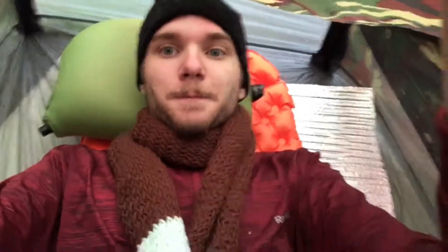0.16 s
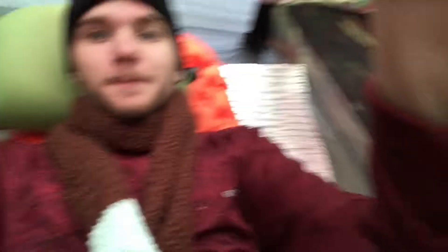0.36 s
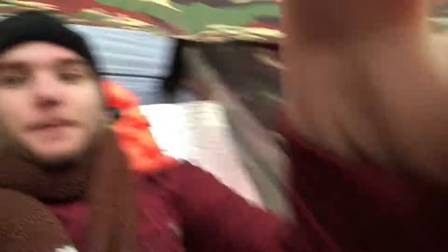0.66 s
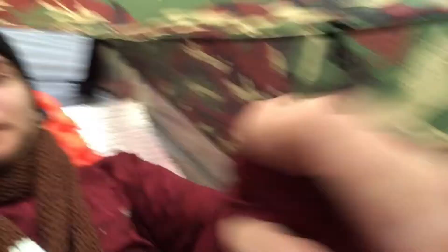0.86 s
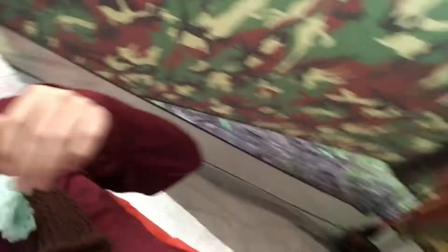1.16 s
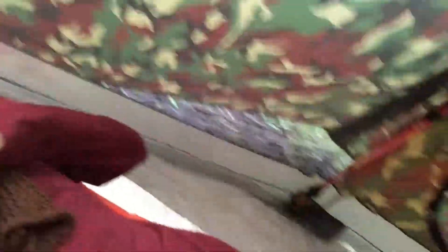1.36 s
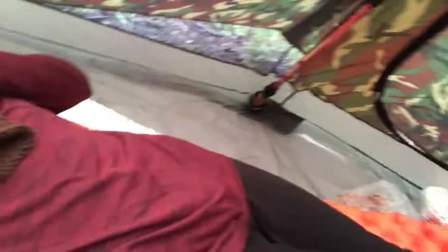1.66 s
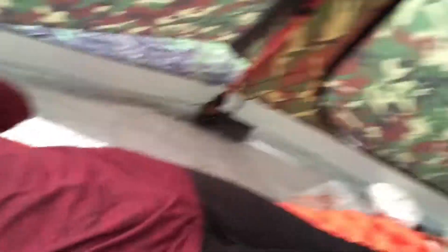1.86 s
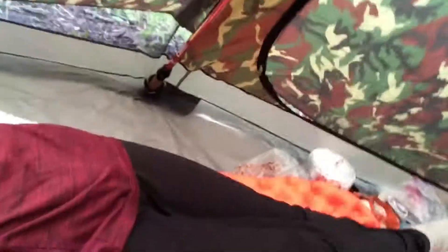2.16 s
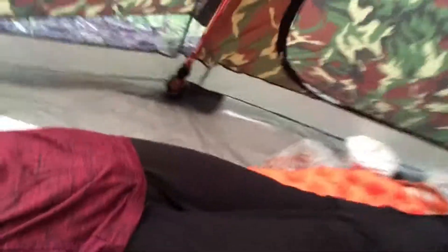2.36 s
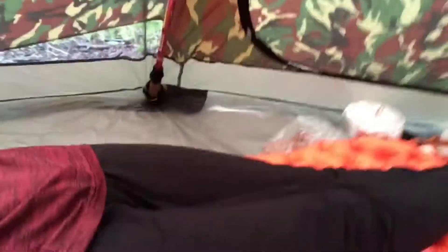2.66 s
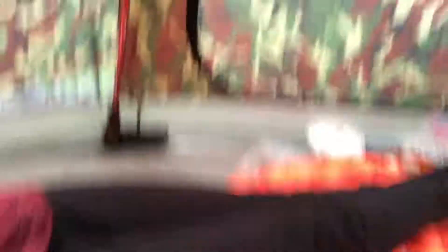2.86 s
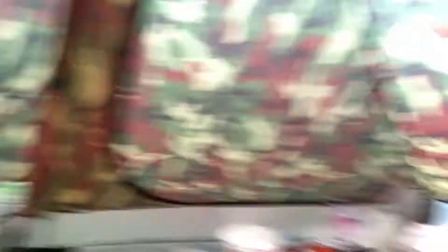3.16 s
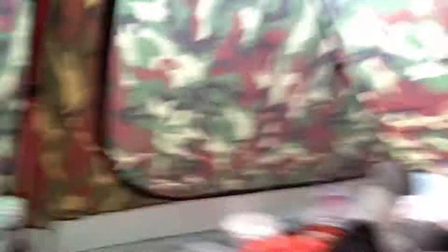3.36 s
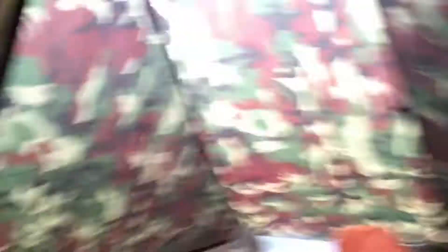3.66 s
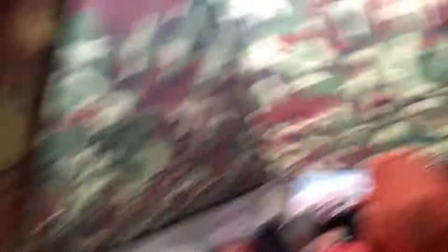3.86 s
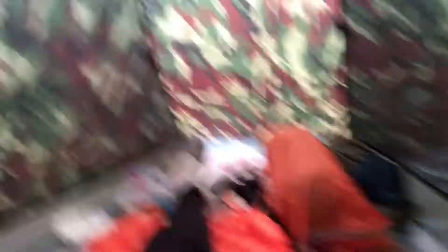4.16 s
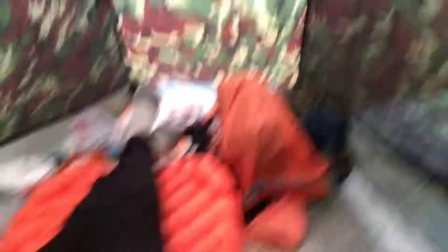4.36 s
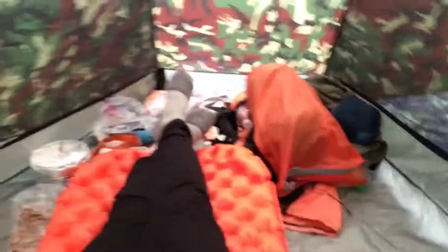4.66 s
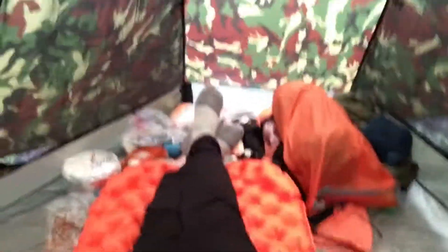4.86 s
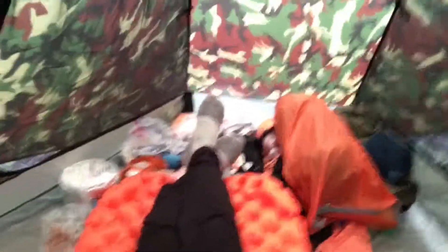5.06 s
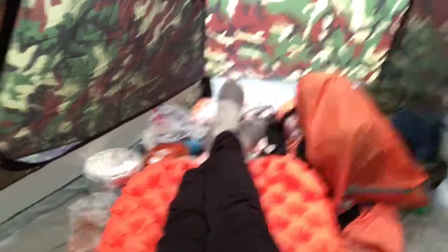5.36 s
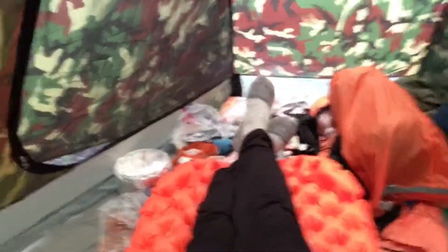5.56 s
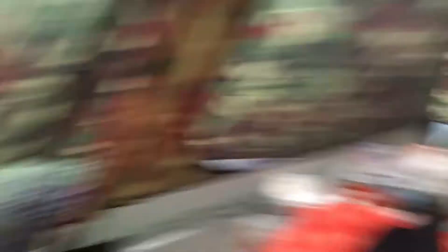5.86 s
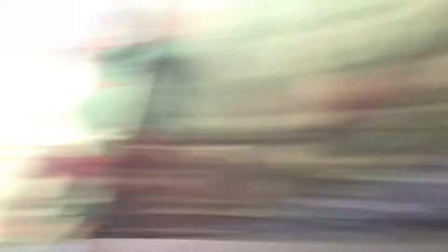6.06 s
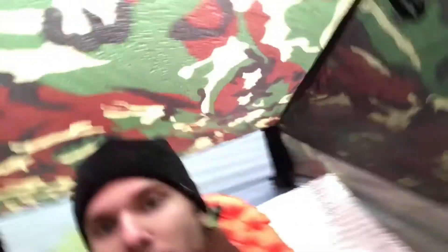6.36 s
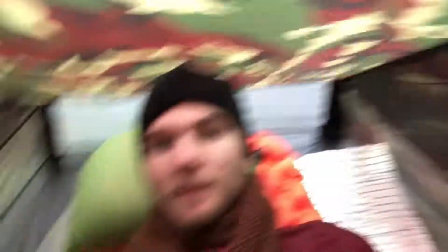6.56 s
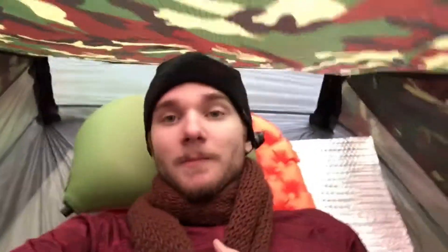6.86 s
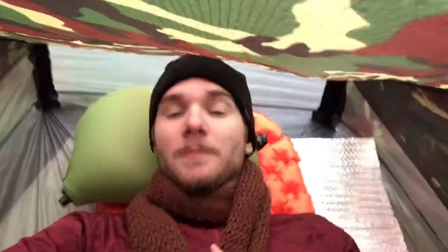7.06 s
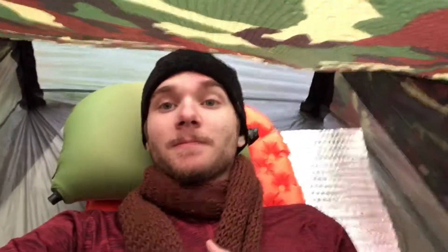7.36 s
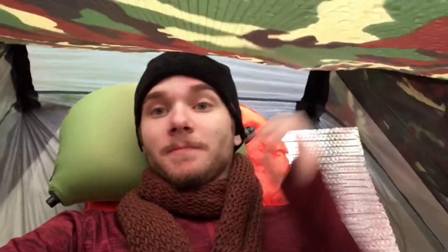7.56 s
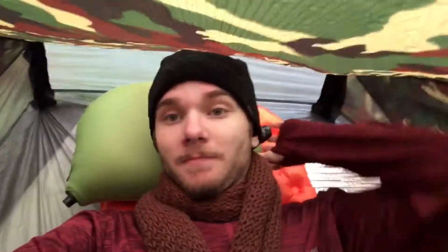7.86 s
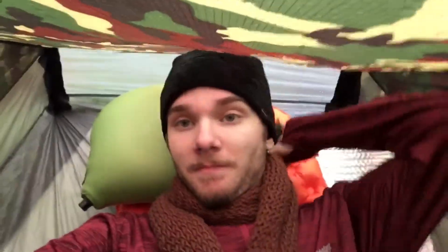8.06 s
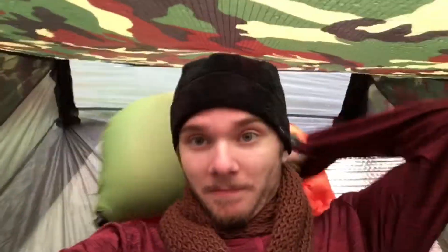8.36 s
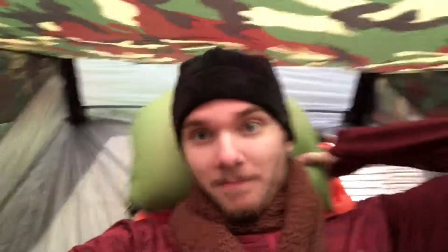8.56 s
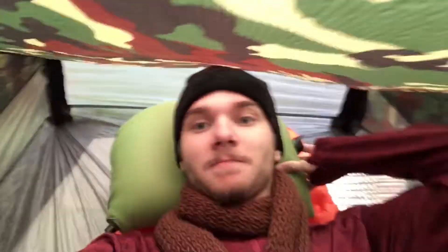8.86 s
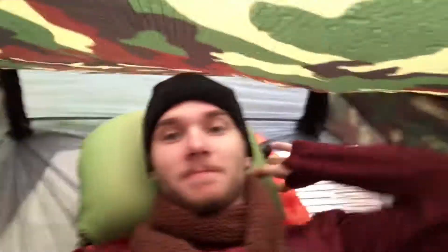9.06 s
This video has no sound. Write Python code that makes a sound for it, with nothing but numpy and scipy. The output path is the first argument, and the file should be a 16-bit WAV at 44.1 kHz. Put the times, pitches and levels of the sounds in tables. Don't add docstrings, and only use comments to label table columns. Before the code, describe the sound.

Inside a tent, fine rain ticks over taut fabric while heavy drips smack nearby; a nylon sleeve swishes and the hand-held microphone knocks.

```python
import sys
import numpy as np
from scipy import signal
from scipy.fft import rfft, irfft, next_fast_len
from scipy.io import wavfile
from scipy.ndimage import uniform_filter1d

SR = 44100
rng = np.random.default_rng(int(sys.argv[2]) if len(sys.argv) > 2 else 0)


def convert_level_to_amplitude(level_db):
    exponent = np.asarray(level_db, float) / 20
    return 10 ** exponent


def transcribe(u):
    v = np.clip(np.atleast_2d(u).T, -1, 1)
    q = np.round(v * 32767).astype(np.int16)
    wavfile.write(sys.argv[1], SR, q)


N = 406161
UNDER_ROOF_S = 6.52
SNAP_T60_S = 0.0032


def rms_one(x):
    return x / np.sqrt(np.mean(x ** 2, axis=-1, keepdims=True) + 1e-20)


def peak_one(x):
    return x / np.abs(x).max(axis=-1, keepdims=True)


def in_time(rows):
    time_s, *columns = np.transpose(rows)
    return [np.interp(np.arange(N) / SR, time_s, column) for column in columns]


def highpass(x, hz):
    return signal.sosfilt(signal.butter(2, hz, "high", fs=SR, output="sos"), x)


def coloured(x, spectrum):
    size = next_fast_len(x.shape[-1])
    hz, db = np.transpose(spectrum)
    log_hz = np.log(np.fft.rfftfreq(size, 1 / SR) + 1)
    gain = convert_level_to_amplitude(np.interp(log_hz, np.log(hz), db, left=-70, right=-70))
    return irfft(rfft(x, size) * gain, size)[..., :x.shape[-1]]


def resonate(x, hz, width_hz):
    r = np.exp(-np.pi * width_hz / SR)
    return signal.lfilter([1, 0, -1], [1, -2 * r * np.cos(2 * np.pi * hz / SR), r * r], x)


def drift(rate_hz):
    r = np.exp(-80 * np.pi * rate_hz / SR)
    noise = rng.standard_normal(N // 40 + 2002)
    slow = signal.lfilter([1], [1, -2 * r, r * r], noise)[2000:]
    return np.interp(np.arange(N) / 40, np.arange(len(slow)), rms_one(slow))


def dying(t, rise_s, t60_s):
    return (1 - np.exp(-t / rise_s)) * convert_level_to_amplitude(-60 * t / t60_s)


def add_at(out, start_s, sound):
    at = round(start_s * SR)
    out[at:at + len(sound)] += sound


# time_s [s], level_db [dB]
PATTER = [(0.0, -48), (0.56, -44.5), (0.74, -47), (1.51, -49.5), (2.0, -48), (2.23, -46.5), (3.05, -47.5),
          (4.51, -49.5), (5.54, -50.5), (5.92, -50.5), (7.1, -46), (7.44, -48), (7.87, -45), (8.75, -44),
          (8.82, -43), (9.21, -47)]
# frequency_hz [Hz], density_db [dB per Hz]
FABRIC = [(35, 5), (60, -2), (308, -1), (389, -4.5), (767, -3), (946, -1), (2250, -6), (3400, -7.5),
          (4030, -10), (4860, -12), (6580, -12), (9350, -12.5), (13600, -17), (16000, -21)]


def patter():
    patches, needles_per_s, roof_needles_times = 20, 110, 1.1
    level_db, = in_time(PATTER)
    t = np.arange(2200) / SR
    sizes = convert_level_to_amplitude(3.05 * np.minimum(rng.exponential(1, N), 3.8)) * rng.choice([-1, 1], N)
    born = rng.random(N) < 950 * convert_level_to_amplitude(2.8 * drift(12)) / SR
    patch = rng.integers(0, patches, N)
    distance = rng.permutation(np.linspace(0, 1, num=patches))[:, None]
    envelopes = dying(t, 0.00007 + 0.001 * distance, 0.0063 + 0.029 * distance)
    bursts = rng.standard_normal((patches, len(t))) * envelopes
    near = 0
    for k, hz in enumerate(np.geomspace(350, 5200, num=patches)):
        ring = rms_one(resonate(bursts[k], hz, 0.18 * hz)) * np.sqrt(hz / 1500)
        burst = ring + 1.7 * rms_one(bursts[k])
        hits = sizes * born * (patch == k)
        near = near + signal.oaconvolve(hits.astype(np.float32), burst.astype(np.float32))[:N]
    far_hiss = convert_level_to_amplitude(-4.2) * convert_level_to_amplitude(0.4 * drift(36)) * rng.standard_normal(N)
    rain = rms_one(near) + far_hiss

    rate = needles_per_s * np.where(np.arange(N) > UNDER_ROOF_S * SR, roof_needles_times, 1)
    tick = rng.standard_normal(200) * dying(t[:200], .0001, SNAP_T60_S)
    needles = signal.oaconvolve(sizes * (rng.random(N) < rate / SR), tick)[:N]
    needles = rms_one(highpass(needles, 1200))
    rain = coloured(rain + convert_level_to_amplitude(-8.5) * needles, FABRIC)
    softened = rain + (convert_level_to_amplitude(-4) - 1) * highpass(rain, 4000)
    return convert_level_to_amplitude(level_db + 1.0) * rms_one(softened)


# time_s [s], level_db [dB]
HAND = [
    (0.0, -65.5),
    (6.31, -68.5),
    (7.31, -61),
    (9.21, -62.5),
]


def hand_rumble():
    band = signal.butter(2, [42, 120], "band", fs=SR, output="sos")
    rumble = signal.sosfilt(band, rng.standard_normal(N))
    level_db, = in_time(HAND)
    return convert_level_to_amplitude(level_db + 1.5 + 3.0 * drift(7.6)) * rms_one(rumble)


# start_s [s], peak_db [dB]
SPRAYS = [(0.045, -40), (0.144, -35), (0.281, -35), (0.339, -36), (0.395, -37), (0.424, -33), (0.703, -31),
          (0.72, -31), (1.025, -33), (1.042, -35), (1.466, -36), (1.618, -39), (1.662, -44), (1.783, -34),
          (2.05, -37), (2.203, -41), (2.221, -40), (2.353, -36), (2.672, -37), (2.786, -32), (3.101, -41),
          (3.424, -40), (3.858, -38), (4.09, -38), (4.587, -44), (4.683, -33.5), (4.92, -45), (4.971, -38),
          (5.007, -30), (5.393, -41), (5.454, -39), (5.582, -36), (5.6, -39), (5.656, -43), (5.844, -47),
          (5.893, -36), (5.958, -38), (6.029, -41), (6.047, -40), (6.273, -37), (6.378, -37), (6.4, -38),
          (6.419, -36), (6.541, -32), (6.618, -35), (6.631, -39), (6.666, -39), (6.727, -29), (6.741, -35),
          (6.764, -37), (7.005, -36), (7.074, -37), (7.098, -33), (7.271, -39), (7.945, -38), (8.268, -36),
          (8.768, -28), (8.817, -28), (8.918, -34), (8.992, -32)]
# frequency_hz [Hz], density_db [dB per Hz]
SPLASH = [(2500, 9), (4000, 4.5), (6500, 5.5), (9000, -1.5), (13000, -5.5), (15500, -24), (17000, -40)]


def sprays():
    t, out = np.arange(2000) / SR, np.zeros(N + 2000)
    for start_s, peak_db in SPRAYS:
        hiss = coloured(highpass(rng.standard_normal(len(t)), 2500), SPLASH)
        add_at(out, start_s, convert_level_to_amplitude(peak_db - 4.0) * peak_one(hiss * dying(t, 0.00023, .012)))
    return out[:N]


# start_s [s], peak_db [dB], splash_db
# [dB], pitch_hz [Hz]
BEADS_AND_PLOPS = [(0.189, -33, -15, 1040), (0.433, -34, -15, 900), (0.662, -30, -15, 1220), (0.772, -33, -15, 2650),
                   (0.854, -37, -15, 1090), (1.354, -33, -15, 1400), (1.988, -34, -15, 1810), (2.05, -37, -15, 1600),
                   (2.148, -35, -15, 2430), (2.219, -37, -15, 3050), (2.298, -32, -15, 1220), (2.703, -33, -15, 1160),
                   (2.729, -36, -15, 1020), (3.754, -40, -15, 1640), (3.858, -34, -15, 1010),
                   (4.09, -33.5, -15, 1690), (4.587, -36, -15, 2500), (4.683, -36, -15, 1560),
                   (4.809, -42, -15, 1290), (4.887, -38, -15, 2060), (5.02, -35, -15, 1290), (5.173, -35, -15, 1270),
                   (5.248, -44, -15, 2640), (5.271, -37, -15, 1390), (5.355, -35, -15, 2720), (5.527, -42, -15, 1850),
                   (5.658, -42, -15, 2760), (5.713, -40, -15, 1300), (5.959, -38, -15, 2960), (6.021, -33, -17, 1300),
                   (6.214, -36, -15, 2010), (6.272, -39, -15, 2230), (6.299, -35, -15, 1350), (6.4, -35, -15, 3140),
                   (6.417, -31, -15, 930), (6.527, -34, -15, 1450), (6.631, -36, -15, 970), (6.875, -36, -15, 2350),
                   (7.057, -37, -15, 1270), (7.112, -28, -15, 1200), (7.162, -32, -15, 1640), (7.401, -37, -15, 960),
                   (7.549, -32, -15, 920), (7.615, -35, -15, 1210), (7.916, -32, -15, 1180), (8.177, -30, -15, 850),
                   (8.469, -29, -15, 1550), (8.622, -34, -15, 1000), (8.759, -26.5, -15, 1390),
                   (9.076, -26, -15, 910),
                   (8.813, -27, -25, 290), (8.891, -27, -20, 414), (7.9, -30, -20, 530), (9.17, -29, -25, 300),
         (6.973, -29, -25, 550), (8.83, -27, -25, 1100), (8.212, -29.5, -25, 520), (8.139, -29, -15, 1560),
         (7.4885, -20, -25, 1500), (8.1613, -20, -25, 750), (2.0048, -20, -15, 2200),
         (1.512, -23, -25, 720), (4.403, -18, -10, 5700), (0.17, -32, -20, 1200), (4.4035, -13, -25, 1940),
         (2.493, -20, -15, 3900), (7.79, -35, -20, 600), (7.968, -35, -20, 850), (6.6, -30, -20, 600),
         (2.0055, -19, -25, 400), (8.296, -23, -20, 2000), (7.188, -24, -20, 1800), (4.406, -24, -20, 3950),
         (1.7185, -23, -15, 4000), (3.35, -38, -20, 330), (8.151, -27, -30, 520), (2.494, -21, -25, 950),
         (2.4945, -22, -25, 2300), (7.489, -24, -30, 750), (7.387, -24, -25, 3000), (3.894, -30, -25, 520),
         (8.21, -27, -25, 3700), (7.462, -32, -25, 950), (8.227, -33, -12, 1400), (4.411, -24, -25, 2000),
         (5.164, -40, -10, 6800), (8.969, -29, -25, 560), (7.716, -31, -8, 3500), (8.2975, -23, -25, 2000)]


def beads():
    t, out = np.arange(2000) / SR, np.zeros(N + 2000)
    for start_s, peak_db, splash_db, pitch_hz in BEADS_AND_PLOPS:
        white = rng.standard_normal((2, len(t)))
        t60_s = 0.0087 + 9.0 / pitch_hz
        turns = pitch_hz * np.cumsum(1 + 0.13 * np.exp(-t / 0.0026)) / SR
        roughness = rms_one(resonate(white[0], pitch_hz, .3 * pitch_hz))
        tone = np.sin(2 * np.pi * turns) + 0.95 * roughness
        plop = peak_one(tone * dying(t, 0.41 / pitch_hz, t60_s))
        hiss = convert_level_to_amplitude(splash_db) * white[1] * dying(t, .0003, 0.011)
        add_at(out, start_s, convert_level_to_amplitude(peak_db - 2.5) * (plop + hiss))
    return out[:N]


# start_s [s], peak_db [dB], thud_db [dB], splash_db [dB], pitch_hz [Hz]
DRIPS = [(.281, -26.5, -20, -19, 1150), (2.0075, -19, -32, -20, 2900), (.447, -27.5, -40, -26, 1290),
         (.5755, -16, -18, -20, 590), (.608, -30, -28, -28, 1270), (.755, -28, -30, -12, 1020),
         (1.124, -30, -11, -12, 1900), (1.368, -25.5, -32, -12.5, 1040), (1.512, -20, -23, -14.5, 637),
         (1.732, -26, -11, -3, 406), (2.0045, -17, -24, -10, 3180), (2.377, -18.5, -20, -9, 1100),
         (2.4925, -16.5, -15, -5, 338), (2.803, -23, -30, -19, 2520), (3.03, -31, -31, -12, 770),
         (3.137, -25, -23, -9.5, 1380), (3.2935, -24.5, -29, -17, 780), (3.51, -26.5, -22, -12, 1010),
         (3.615, -27, -18, -14, 1330), (3.893, -23, -35, -10, 1130), (4.4027, -12, -13.5, -9, 614),
         (4.4322, -20, -23, -10, 1000), (4.634, -27.5, -15, 2, 755), (5.112, -29, -24, -13.5, 1130)]
TAPS = [(6.161, -27.5, -38, -18, 1010), (6.362, -28, -37, -9, 1470), (6.726, -38, -30, -4, 1500),
        (7.023, -33, -32, -12, 1400), (6.541, -24.5, -40, -20, 900), (6.557, -25, -40, -14, 1520),
        (6.897, -19.5, -44, -12.5, 1460), (6.973, -25.5, -16, -17, 1130), (7.014, -23.5, -20, -14, 576),
        (7.188, -18.5, -23, -9, 730), (7.237, -27, -33, -11, 1220), (7.3867, -12.5, -21.5, -25, 770),
        (7.4877, -14, -20, -21, 620), (7.636, -25.5, -26, -16, 1530), (7.6853, -23, -32, -7, 657),
        (7.835, -21, -25, -12, 990), (7.862, -15.5, -24, -15.5, 2760), (7.929, -23, -34, -15, 885),
        (8.102, -19.5, -27, -35, 1500), (8.161, -21.5, -14, -37, 800), (8.2092, -20.5, -25, -15, 2340),
        (8.2967, -14, -26, -19, 870), (8.966, -17.5, -20, -17.5, 1210), (9.167, -19, -22, -17, 990)]
SPILLS = [(.71, -29.5, -14, -19, 1050), (.943, -25.5, -15.5, -6, 1000), (1.553, -33.5, -26, -10, 1590),
          (1.718, -22, -22, -8.5, 1160), (1.755, -20, -19, -12.5, 1180), (1.85, -33, -14.5, -5.5, 937),
          (2.773, -33.5, -28, -10, 711), (2.961, -33, -41, -10, 1160), (3.1995, -25, -20, -13.5, 2940),
          (3.732, -31.5, -26, -10, 1560), (3.83, -35.5, -13.5, -8, 1350), (6.455, -24.5, -14, -3.5, 2880),
          (7.455, -30, -27, -11, 1080), (7.704, -26.5, -25, -7, 960), (7.721, -23, -29, -15, 956),
          (7.758, -29, -20, -17, 1190), (7.815, -27, -18, -17, 598), (8.347, -24, -36, -33, 974),
          (8.656, -28, -32, -12, 956), (8.731, -25, -21, -19, 880), (8.829, -24, -19, -9, 1440),
          (9.013, -26, -23, -19, 1460), (6.3375, -25, -15, -10, 298), (6.502, -21, -24, -7.5, 2650)]
# start_s [s], peak_db [dB], splash_db [dB], pitch_hz [Hz]
LIGHT_DRIPS = [(0.177, -32, -14, 1120), (0.395, -26, -16, 947), (0.71, -34, -16, 1070),
               (0.853, -36, -11, 1000), (0.974, -31, -17, 891), (1.02, -33, -13, 1980),
               (1.268, -33.5, -18, 1960), (1.354, -29.5, -14.5, 1040), (1.43, -34, -7, 738),
               (1.721, -26.5, -10, 1150), (1.832, -36, -13, 894), (1.882, -31, -12, 1320),
               (2.049, -35, -13, 1540), (2.091, -32.5, -10, 926), (2.117, -31.5, -10, 896),
               (2.435, -31, -13, 3140), (2.917, -34, -13, 877), (3.412, -33, -16, 982),
               (4.036, -33.5, -13, 1170), (4.236, -29.5, -13, 2230), (4.586, -35, -18, 1040),
               (4.72, -35, -13, 1040), (4.996, -34, -10, 549), (5.143, -39, -6, 821), (5.163, -38, -7, 1210),
               (5.27, -37, -7, 1370), (5.298, -34, -13, 1550), (5.519, -37, -10, 1240),
               (5.758, -33.5, -20, 1030),
               (6.021, -34, -19, 1310), (6.087, -32, -16, 2270), (6.183, -37, -13, 1040),
              (6.214, -35, -15, 958), (6.665, -34, -15, 1390), (6.716, -36, -15, 848),
              (6.918, -27, -12, 1200), (6.931, -30, -9, 1400), (7.126, -27, -15, 1120),
              (7.343, -32, -21, 525), (7.422, -31, -15, 2260), (7.523, -35, -13, 929),
              (7.914, -32, -19, 1170), (8.03, -32, -17, 1180), (8.059, -30, -19, 1200),
              (8.074, -27, -15, 1710), (8.234, -34, -15, 573), (8.408, -23.5, -13, 1030),
              (8.503, -25.5, -8, 1080), (8.621, -28.5, -11, 985), (8.683, -24.5, -12, 1160),
              (8.697, -25.5, -13, 2910), (8.743, -26.5, -15, 554), (8.882, -27, -15, 756),
              (8.937, -33, -15, 1310), (9.076, -31, -15, 958), (9.186, -30, -12, 724)]


def landings():
    rows = []
    for table, t60_s in [(DRIPS, 0.035), (TAPS, 0.027), (SPILLS, 0.046)]:
        rows += [(*row, t60_s) for row in table]
    for start_s, peak_db, splash_db, pitch_hz in LIGHT_DRIPS:
        rows.append((start_s, peak_db, -23.5, splash_db, pitch_hz, 0.018))
    return rows


# frequency_hz [Hz], density_db [dB per Hz]
SMACK = [(300, -3), (500, 2.5), (1100, -3), (2000, 1.5), (3500, -5), (5000, -10.5)]


def drips():
    start_s, peak_db, thud_db, splash_db, pitch_hz, t60_s = np.transpose(landings())[:, :, None]
    t = np.arange(4000) / SR
    on_roof = start_s >= UNDER_ROOF_S
    white = rng.standard_normal((len(start_s), 4, len(t)))
    crumbs = convert_level_to_amplitude(2.6 * rms_one(uniform_filter1d(white[:, 2:], size=40)))

    dryness = convert_level_to_amplitude(-.6 * (np.clip(splash_db, -30, -4) + 16.0))
    white[:, 0, 24] += 9 * dryness[:, 0]
    white[:, 0, 44] -= 5.0 * dryness[:, 0]
    crack = 1 + (0.9 + 0.32 * dryness) * convert_level_to_amplitude(-60 * t / 0.0084)

    rise_s = np.where(on_roof, 0.00064, 0.00065)
    smack = coloured(white[:, 0], SMACK) * dying(t, rise_s, t60_s)
    smack = peak_one(smack * crumbs[:, 0] * crack)
    rings = np.array([resonate(x, hz, 170 + 0.24 * hz) for x, hz in zip(smack, pitch_hz[:, 0])])
    smack = peak_one(smack + (0.65 + 0.064 * dryness) * peak_one(rings))

    splash_t60_s = 1.54 * t60_s * np.where(on_roof, 0.15, 1)
    splash = coloured(white[:, 1], SPLASH) * dying(t, 0.0005, splash_t60_s)
    splash = peak_one(splash * crumbs[:, 1] * crack)

    chance = rng.random((len(start_s), 2))
    thud_hz = (90 + 300 * np.exp(-t / 0.004)) * (0.698 + 0.834 * chance[:, :1])
    thud = np.sin(2 * np.pi * np.cumsum(thud_hz, axis=1) / SR)
    thud = thud * dying(t, 0.00016, 1.42 * t60_s) * np.sign(chance[:, 1:] - .5)

    each = convert_level_to_amplitude(peak_db - 0.82) * (smack + convert_level_to_amplitude(splash_db + 5.5) * splash + convert_level_to_amplitude(thud_db + 8.0) * thud)
    snap = peak_one(highpass(white[:, 3] * convert_level_to_amplitude(-60 * t / SNAP_T60_S), 3300))
    each += convert_level_to_amplitude(peak_db + splash_db + np.where(on_roof, 4, 1.5)) * snap
    out = np.zeros(N + len(t))
    for at_s, sound in zip(start_s[:, 0] + .0006, each):
        add_at(out, at_s, sound)
    return out[:N]


# middle_s [s], length_s [s], swish_db [dB], rustle_db [dB]
SLEEVE = [(0.342, 0.15, -45, -57), (.58, 0.19, -47, -58), (.63, 0.31, -62, -53.5), (0.768, 0.105, -48, -51),
          (0.91, 0.07, -57, -52), (8.08, 0.36, -59, -55), (8.25, 0.46, -59, -56), (8.507, 0.28, -47, -41.5),
          (8.718, 0.18, -55, -48), (8.88, 0.36, -58, -53), (9.066, 0.28, -59, -54)]
# frequency_hz [Hz], density_db [dB per Hz]
SWISH = [(10000, -30), (11500, -10), (13300, 6), (14500, 4), (16000, 9)]
# frequency_hz [Hz], density_db [dB per Hz]
RUSTLE = [(900, -12), (2500, -25), (5000, -3.5), (8500, -1.5), (11500, 0.5), (13500, -6), (16000, -17)]


def sleeve():
    white, t = rng.standard_normal((2, N)), np.arange(N) / SR
    swish = rms_one(coloured(white[0] * convert_level_to_amplitude(1.5 * drift(40)), SWISH))
    rustle = rms_one(coloured(white[1] * convert_level_to_amplitude(0.63 * drift(170)), RUSTLE))
    out = 0
    for middle_s, length_s, swish_db, rustle_db in SLEEVE:
        speed = np.clip(1 - (2 * (t - middle_s) / length_s) ** 2, 0, 1) ** 3.0
        trailing = np.roll(speed, round(length_s / 10 * SR))
        out = out + speed * convert_level_to_amplitude(swish_db) * swish + trailing * convert_level_to_amplitude(rustle_db) * rustle
    return out


# start_s [s], length_s [s], from_hz [Hz], to_hz [Hz], level_db [dB]
SQUEAK = (.312, .075, 920, 640, -47.5)


def squeak():
    start_s, length_s, from_hz, to_hz, level_db = SQUEAK
    along = np.clip((np.arange(N) / SR - start_s) / length_s, 0, 1)
    slip_hz = (from_hz + (to_hz - from_hz) * along ** 1.3) * (1 + .01 * drift(70))
    phase = 2 * np.pi * np.cumsum(slip_hz) / SR
    upper = sum(convert_level_to_amplitude(db) * np.sin((k + 2) * phase) for k, db in enumerate((4, -1, -4)))
    fading = np.clip(4 * (.72 - along), 0, 1)
    swell = np.sqrt(np.abs(np.sin(np.pi * along)))
    return convert_level_to_amplitude(level_db + 2.0 * drift(50)) * swell * (np.sin(phase) + fading * upper)


def blows(rows):
    t, out = np.arange(6000) / SR, np.zeros(N)
    for start_s, peak_db, mode_hz, t60_s, rise_s in rows:
        add_at(out, start_s, convert_level_to_amplitude(peak_db) * np.sin(2 * np.pi * mode_hz * t) * dying(t, rise_s, t60_s))
    return out


# start_s [s], peak_db [dB], pitch_hz [Hz], t60_s [s]
BUMPS = [(.32, -32, 49.6, 0.097), (.585, -24, 76, 0.074), (.705, -31, 55, 0.15), (1.765, -35, 50, 0.14),
         (2.386, -30, 65, 0.078), (4.41, -38, 55, 0.1), (7.386, -29, 150, .05), (7.487, -31, 150, .05),
         (7.091, -21, 60, 0.078), (7.099, -26, 244, 0.034), (7.109, -26, 400, 0.044),
         (7.394, -27, 79.5, 0.066), (7.851, -31.5, 96, 0.11), (8.81, -31, 188, 0.063),
         (7.49, -30, 170, 0.04)]


def soft_bumps():
    return blows([(*bump, .012) for bump in BUMPS])


# start_s [s], peak_db [dB]
KNOCK = [
    (0.572, -41),
    (0.5766, -13.5),
]
# mode_hz [Hz], level_db [dB], t60_s [s]
CASE = [
    (273, -6, 0.038),
    (655, 2, 0.016),
    (1040, 13, 0.0045),
    (1370, 0, 0.016),
]


def case_knock():
    return blows([(start_s, peak_db + level_db, mode_hz, t60_s, .0004)
                  for start_s, peak_db in KNOCK for mode_hz, level_db, t60_s in CASE])


# start_s [s], peak_db [dB], pitch_hz [Hz]
HEAVES = [(.944, -38, 70), (2.005, -31, 72), (2.378, -33, 85), (2.493, -29, 72), (4.404, -21, 75),
          (6.338, -37, 75), (7.189, -34, 110), (7.388, -28, 135), (8.162, -38, 60), (.578, -22, 250)]


def wall_heaves():
    return blows([(start_s, peak_db, hz, 3.2 / hz, .003) for start_s, peak_db, hz in HEAVES])


def scene():
    rain = patter() + sprays() + beads() + drips() + wall_heaves()
    handling = hand_rumble() + sleeve() + squeak() + soft_bumps() + case_knock()
    return (rain + handling)[None]


def top_cut(x):
    return signal.sosfilt(signal.butter(12, 16650, fs=SR, output="sos"), x)


# centre_hz [Hz], width_hz [Hz], depth_db [dB]
PORT_DIPS = [(4950, 115, -3.5), (10490, 320, -5)]


def record(dry):
    cutoff_hz = 15800
    size = next_fast_len(N)
    hz = np.fft.rfftfreq(size, 1 / SR)
    dips_db = sum(db * np.exp(-((hz - at_hz) / width_hz) ** 2) for at_hz, width_hz, db in PORT_DIPS)
    heard = irfft(rfft(dry, size) * convert_level_to_amplitude(dips_db), size)[:, :N]
    cut = signal.sosfilt(signal.ellip(8, .5, 20, cutoff_hz, fs=SR, output="sos"), heard)
    cut = signal.sosfilt(signal.cheby2(10, 50, cutoff_hz + 800, fs=SR, output="sos"), cut)
    mix = highpass(cut, 42)
    return top_cut(mix)


dry = scene()
out = record(dry)
transcribe(out)
```